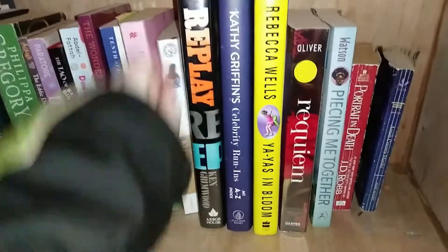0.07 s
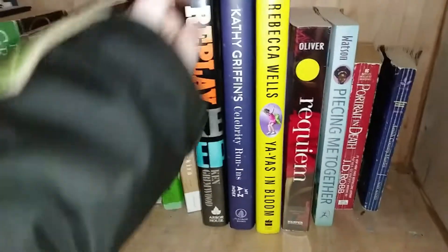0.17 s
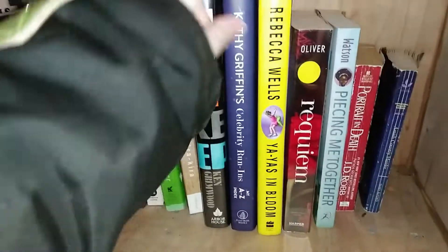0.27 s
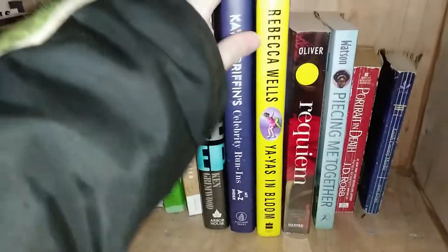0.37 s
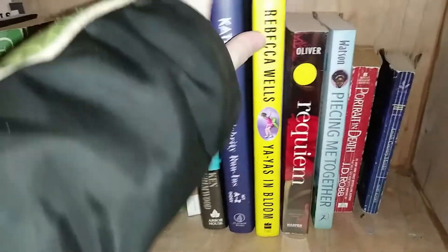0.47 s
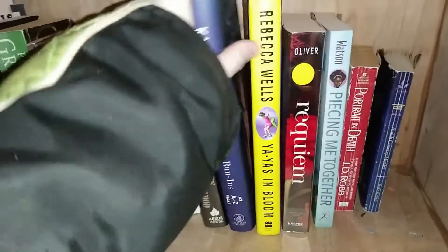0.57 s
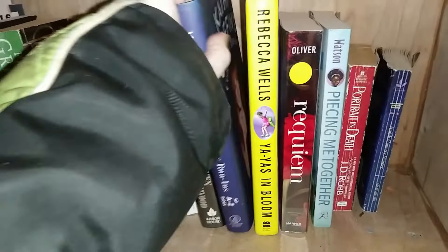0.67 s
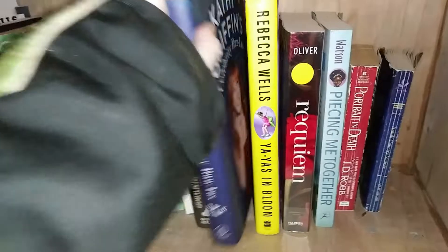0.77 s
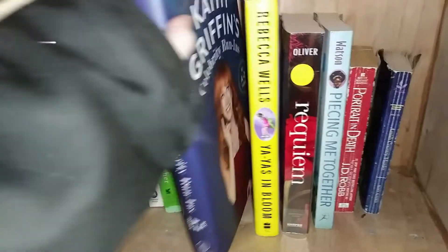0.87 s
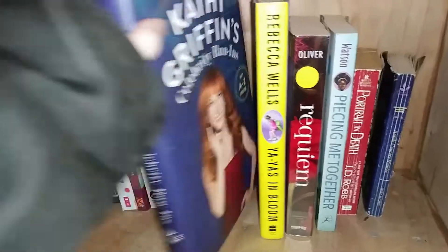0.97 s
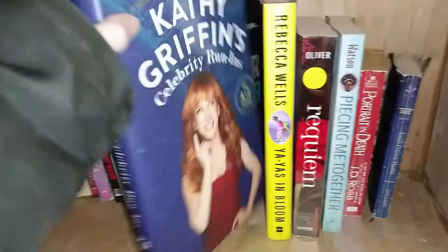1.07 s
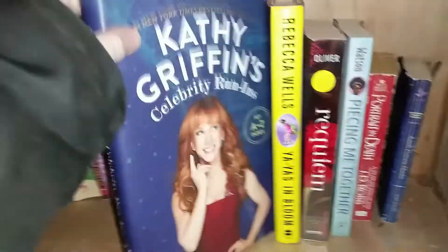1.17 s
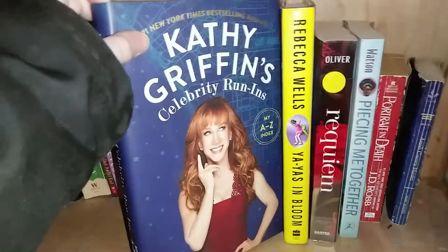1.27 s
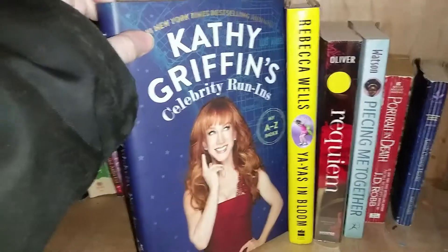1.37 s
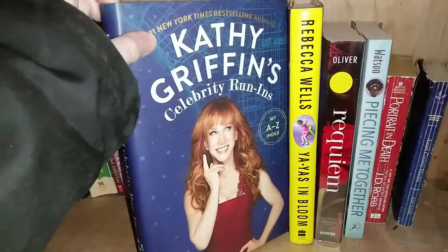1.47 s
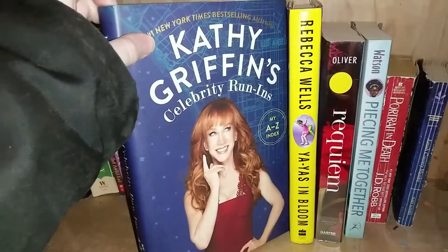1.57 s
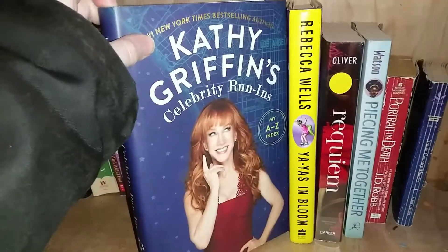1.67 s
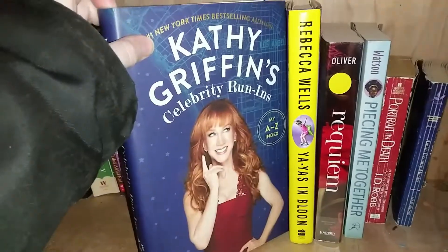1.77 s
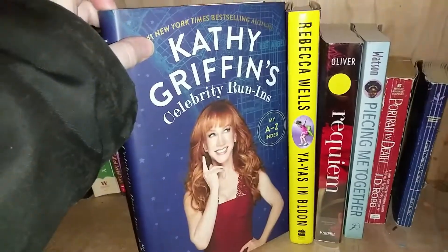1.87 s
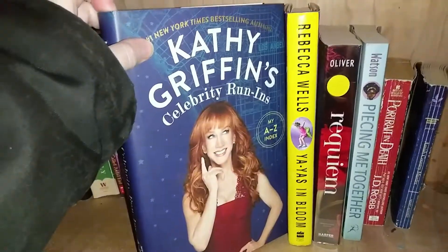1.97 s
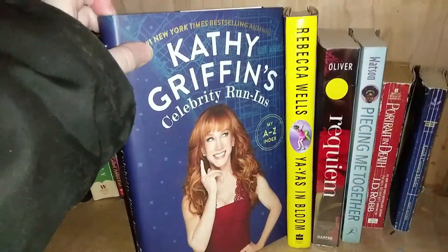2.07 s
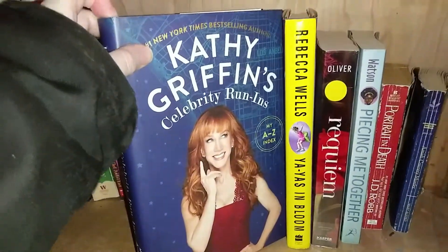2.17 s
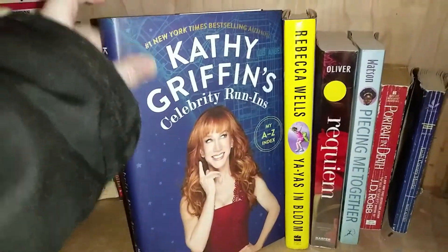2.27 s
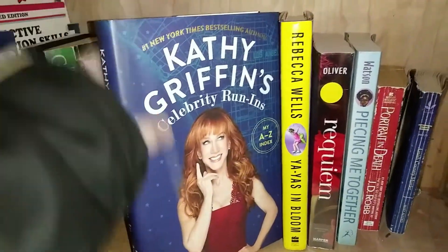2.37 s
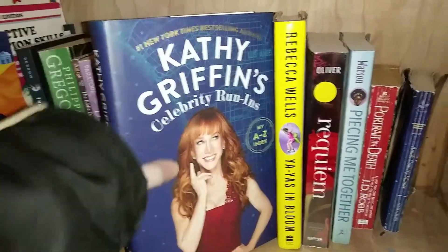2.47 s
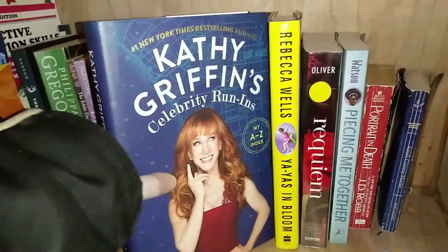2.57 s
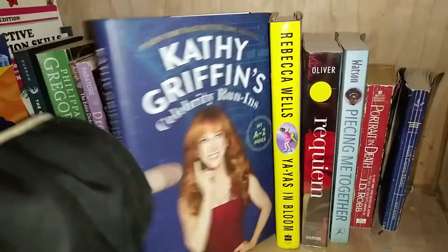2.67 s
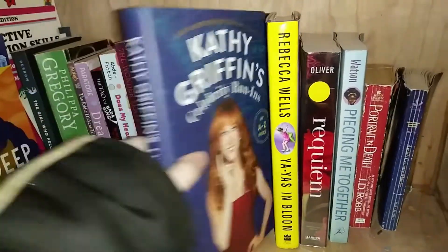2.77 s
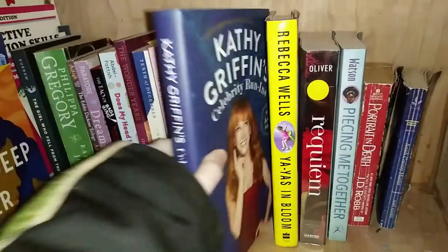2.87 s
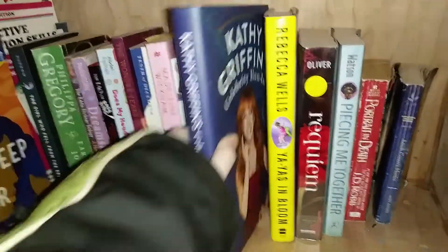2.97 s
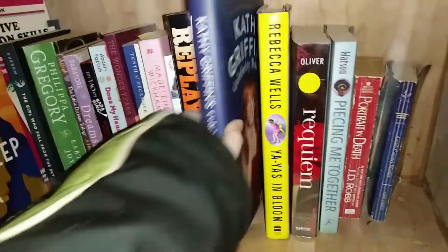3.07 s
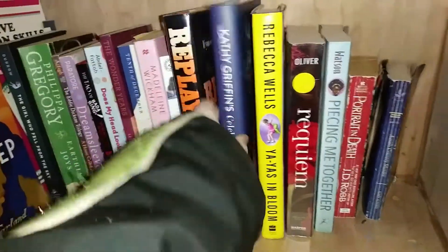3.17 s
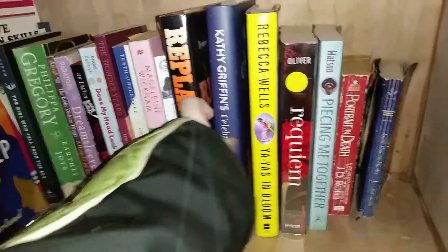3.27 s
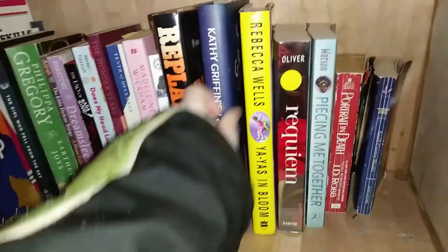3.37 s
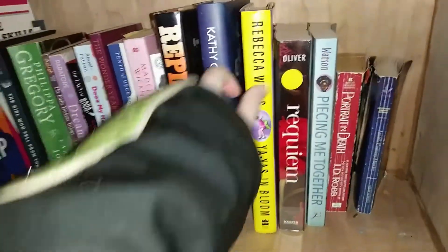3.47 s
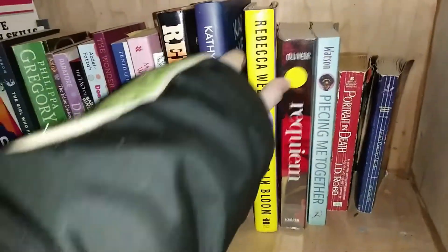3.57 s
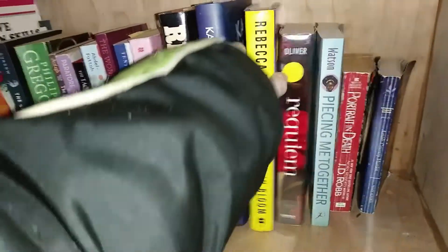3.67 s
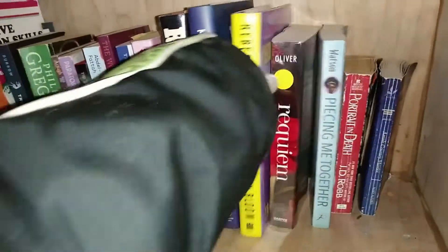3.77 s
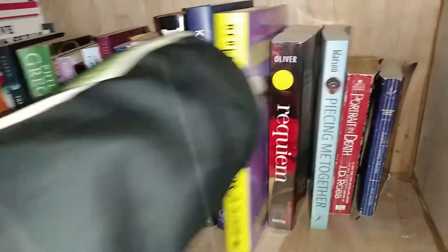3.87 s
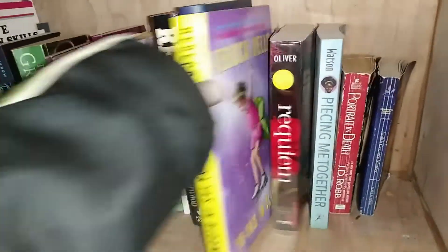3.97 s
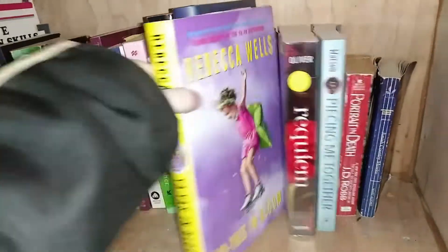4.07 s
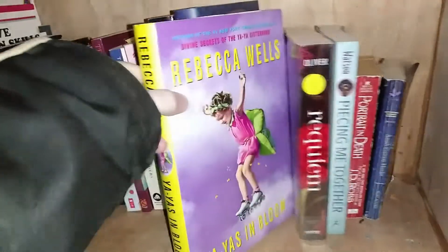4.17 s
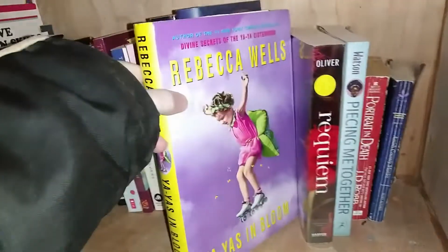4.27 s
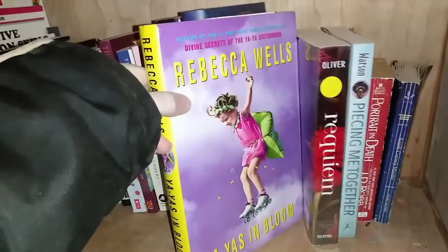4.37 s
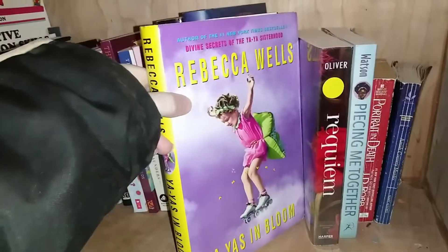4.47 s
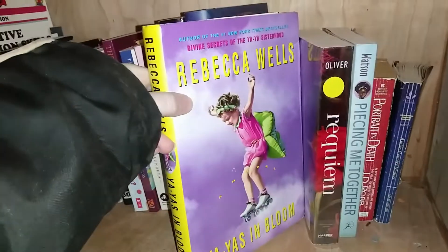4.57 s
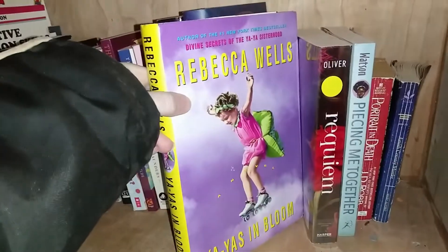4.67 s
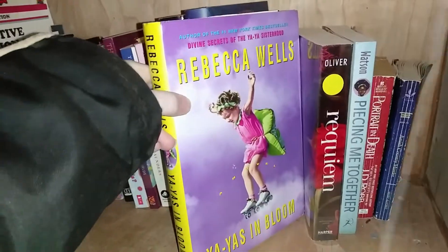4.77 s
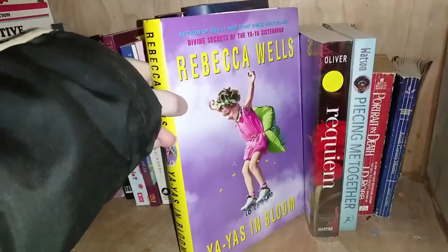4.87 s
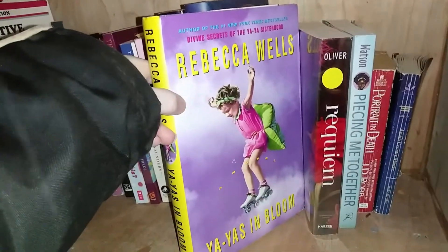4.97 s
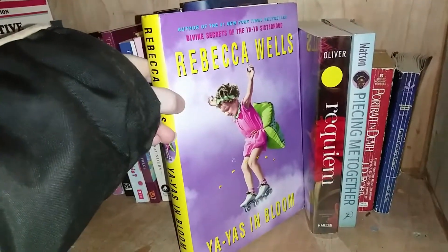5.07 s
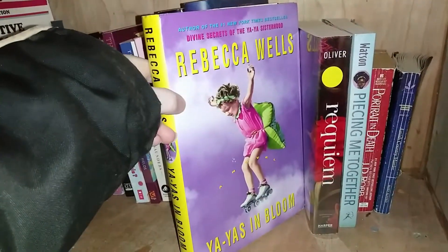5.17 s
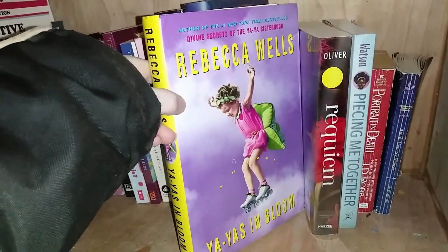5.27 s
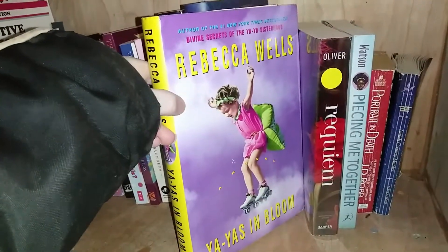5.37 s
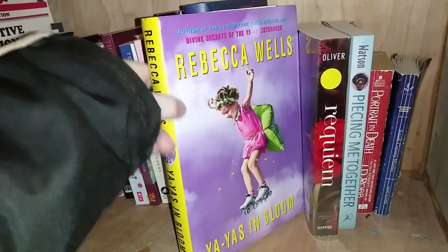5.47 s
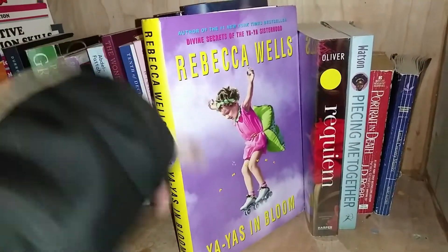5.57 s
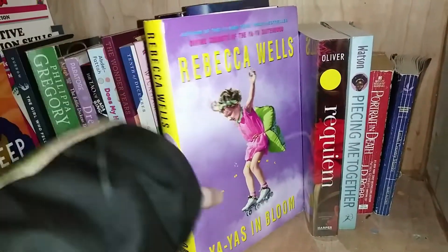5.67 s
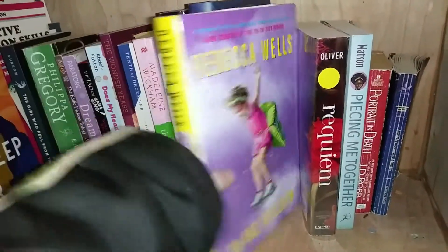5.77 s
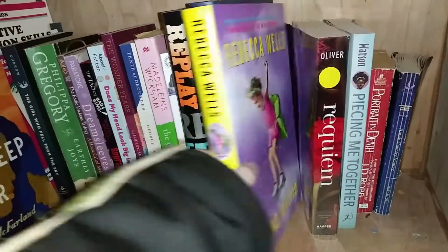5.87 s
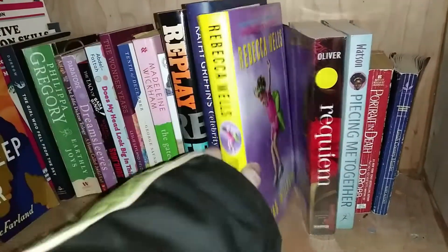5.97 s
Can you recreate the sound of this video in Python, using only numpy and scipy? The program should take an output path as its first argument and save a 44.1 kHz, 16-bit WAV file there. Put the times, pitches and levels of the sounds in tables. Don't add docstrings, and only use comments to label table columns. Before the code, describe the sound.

Close phone microphone at a wooden book box, with thin bass and faint hiss. Bright stick-slip sliding with a short jacket whine comes first, then a crisp hollow clack. After a still pause with tiny clicks, covers snap and rub faster until a heavy book drops corner first, then flat, the loudest moment. Another book scrapes out with a flurry of light taps, rests among sparse ticks, and finally slides back softly.

```python
import sys
import numpy as np
from scipy import signal
from scipy.fft import rfft, irfft
from scipy.io import wavfile
from scipy.ndimage import uniform_filter1d

SR = 44100
rng = np.random.default_rng(int(sys.argv[2]) if len(sys.argv) > 2 else 0)


def unload_audio(sound):
    columns = np.transpose(np.atleast_2d(sound))
    steps = np.round(np.clip(columns, -1, 1) * 32767)
    wavfile.write(sys.argv[1], SR, steps.astype(np.int16))


def gain_from_db(level_db):
    decades = np.asarray(level_db, float) / 20
    return 10 ** decades


N = 264776


def rms_one(x):
    return x / np.sqrt(np.mean(x ** 2) + 1e-20)


def drift(rate):
    r = np.exp(-80 * np.pi * rate / SR)
    noise = rng.standard_normal(N // 40 + 2002)
    slow = signal.lfilter([1], [1, -2 * r, r * r], noise)[2000:]
    return np.interp(np.arange(N) / 40, np.arange(len(slow)), rms_one(slow))


def ring(clicks, hz, t60):
    r = gain_from_db(-60 / (t60 * SR))
    w = 2 * np.pi * hz / SR
    return signal.lfilter([0, np.sin(w)], [1, -2 * r * np.cos(w), r * r], clicks + 1e-18)


def resonance(x, hz, width_hz):
    r = np.exp(-np.pi * width_hz / SR)
    poles = [1, -2 * r * np.cos(2 * np.pi * hz / SR), r * r]
    return signal.lfilter(np.array([1, 0, -1]) * (1 - r * r) / 2, poles, x)


def grains(per_s, spread_db, share):
    sizes = gain_from_db(spread_db * np.minimum(rng.exponential(1, (2, N)), 4)) * rng.choice([-1, 1], (2, N))
    caught = rng.random((1, N)) < per_s / SR
    return share * rms_one(sizes * caught) + np.sqrt(1 - share ** 2) * rng.standard_normal((2, N))


def coloured(source, spectrum, patchy_db, rate):
    out = 0
    together = drift(rate)
    at, level = np.transpose(spectrum)
    edges = 80 * 2 ** np.arange(0, 7.7, 1 / 3)
    for k, (low, high) in enumerate(zip(edges, edges[1:])):
        hz = np.sqrt(low * high)
        if at[0] / 1.3 < hz < at[-1] * 1.3:
            sos = signal.butter(2, [low, high], "band", fs=SR, output="sos")
            band = signal.sosfilt(sos, source[k % 2])
            flicker_db = patchy_db * (together + 0.77 * drift(rate))
            out = out + band * gain_from_db(np.interp(np.log(hz), np.log(at), level) + flicker_db)
    return rms_one(out)


def gesture(s, held, db, rest_db):
    rise_db_per_s, fall_db_per_s = 234, 167
    t = np.arange(N)[::32, None] / SR
    level = db - rise_db_per_s * np.maximum(s - t, 0) - fall_db_per_s * np.maximum(t - s - held, 0)
    gain = np.sqrt(np.sum(gain_from_db(2 * level), axis=1) + gain_from_db(2 * rest_db))
    return np.interp(np.arange(N) / SR, t[:, 0], gain)


def slips(table, spread):
    size = 18000
    out, t = np.zeros(N + size), np.arange(size) / SR
    for s, db, hz, rise, fade in table:
        noise = rng.standard_normal((2, size))
        low_hz, high_hz = hz / spread, hz * spread
        rough = noise[0] * gain_from_db(22 * uniform_filter1d(noise[1], size=90))
        sos = signal.butter(3, [low_hz, high_hz], "band", fs=SR, output="sos")
        tone = rms_one(signal.sosfilt(sos, rough))
        soft = signal.lfilter(*signal.butter(1, 2 * high_hz, fs=SR), tone + 0.071 * rough)
        shape = np.where(t < rise, t / rise, gain_from_db(-60 * (t - rise) / fade))
        out[round(s * SR):][:size] += gain_from_db(db) * shape * soft
    return out[:N]


def ticks(table, t60, stutter=0):
    out, click = np.zeros(N + 600), np.eye(1, 600)[0]
    click[round(0.0014 * SR) * np.array([1, 2])] = -stutter, stutter ** 2
    for s, db, hz in table:
        apart = rng.uniform(1.1, 1.3)
        snap = ring(click, hz, t60) + 1.07 * ring(click, hz / apart, t60)
        snap = snap - 0.5 * ring(click, hz * apart, 1.5 * t60)
        tick = resonance(resonance(snap, hz, 2.5 * hz), hz, 1.7 * hz)
        tick = tick + 0.65 * resonance(click, 0.55 * hz, 0.5 * hz) + 0.5 * resonance(click, 11400, 6000)
        out[round(s * SR):][:600] += gain_from_db(db - 1.5) * tick
    return out[:N]


def knocks(blows, modes):
    out, click = np.zeros(N + 9000), np.eye(1, 9000)[0]
    for s, db, hard_hz, deep_db, free in blows:
        body = 0
        for k, (hz, level_db, t60) in enumerate(modes):
            gain_db = level_db + 2 * rng.standard_normal() + deep_db * (hz < 550)
            body = body + (-1) ** k * gain_from_db(gain_db) * ring(click, hz, t60 * max(free, 0.1))
        out[round(s * SR):][:9000] += gain_from_db(db - 7) * signal.lfilter(*signal.butter(2, hard_hz, fs=SR), body)
    return out[:N]


def far_air():
    # f/Hz, level/dB
    air_spectrum = [(47, -60), (80, -33), (208, -9), (386, -5), (471, 2), (1090, -6.5), (1370, -6),
                    (1600, 0.5), (1860, -7.5), (2080, -8), (3390, -22.5), (5400, -19), (10300, -26),
                    (15000, -33.5), (16000, -31)]
    # f/Hz, width/Hz, level/dB
    box_modes = [(472.5, 9.7, 6.5), (850, 26, 2), (1373, 86, 3), (1823, 63, 7)]
    wash = coloured(rng.standard_normal((2, N)), air_spectrum, patchy_db=0.67, rate=12)
    box = sum(gain_from_db(db) * resonance(wash, hz, width) for hz, width, db in box_modes)
    return gain_from_db(-56 - 6.5) * (wash + 0.76 * box)


def hand():
    # f/Hz, level/dB
    rub_spectrum = [(2200, -19), (3000, -6.5), (3800, -25), (4600, 1.5), (5600, -1), (6600, 1.5),
                    (7800, -13), (9400, -23), (12000, -30)]
    # f/Hz, level/dB
    drag_spectrum = [(59, -63.5), (100, -28), (194, -8), (290, -4.5), (555, -4.5), (779, 0), (1910, -3.5),
                     (2330, -4), (2850, -3.5), (4000, -7), (5200, -22), (8800, -120)]
    # f/Hz, level/dB
    swish_spectrum = [(5000, -52), (8000, 19.5), (10000, -21), (13000, 11), (16000, -34)]
    # t/s, held/s, cover rub level/dB, weight on the edge/dB
    strokes = [(0, .25, -60.5, 1), (.44, 0.087, -62.5, -1.5), (.55, 0.085, -48, -4.5),
               (.73, 0.074, -51.5, -4), (.85, 0.18, -54, -0.5), (1.04, 0.07, -53.5, 3),
               (1.15, 0.12, -55, -6), (2.19, 0.034, -63.5, 0), (2.32, 0.069, -50.5, -17),
               (2.409, 0.094, -47, -8.5), (2.59, 0.049, -45, -11), (2.72, 0.033, -44.5, -6.5),
               (2.82, .06, -63.5, 7.5), (2.94, 0.018, -43, -1.5), (3.0, 0.071, -47.5, 1),
               (3.09, 0.083, -40, -7.5), (3.25, 0.044, -60, 4), (3.309, 0.062, -49.5, -5.5),
               (3.5, 0.02, -51.5, 1), (3.58, 0.044, -47.5, -3.5), (3.69, .09, -56, 0.5),
               (3.83, 0.14, -47.5, -2), (4.01, 0.074, -44, -3.5), (4.09, 0.047, -43.5, -1.5),
               (4.17, 0.072, -49.5, 3), (4.88, 0.11, -66, 1.5), (5.61, 0.057, -57, -11),
               (5.72, 0.028, -69.5, 11.5), (5.801, 0.052, -48.5, -4), (5.95, 0.065, -52, -4.5)]
    # t/s, held/s, level/dB
    swings = [(0, 0.36, -70), (.56, 0.027, -59), (.86, 0.46, -66.5), (2.32, 0.18, -54.5), (2.73, .02, -63),
              (2.88, .17, -62.5), (3.11, 0.063, -54.5), (3.48, 0.49, -64.5), (3.97, 0.046, -67),
              (4.15, .07, -65), (4.58, 0.21, -73.5), (5.6, 0.09, -65), (5.79, .06, -64), (5.959, .05, -72)]
    s, held, db, weight_db = np.transpose(strokes)
    rub = coloured(grains(900, spread_db=4, share=0.45), rub_spectrum, patchy_db=1.5, rate=45)
    drag = coloured(grains(500, spread_db=3.5, share=0.4), drag_spectrum, patchy_db=1.7, rate=35)
    swish = coloured(grains(400, spread_db=4, share=0.35), swish_spectrum, patchy_db=1.2, rate=30)
    covers = gesture(s, held, db, rest_db=-65) * rub
    edges = gesture(s, held, db + weight_db, rest_db=-64) * drag
    sleeve = gesture(*np.transpose(swings), rest_db=-95) * swish
    return covers + edges + sleeve


def creaks():
    sizes = gain_from_db(3.5 * np.minimum(rng.exponential(1, N), 3)) * rng.choice([-1, 1], N)
    clicks = (rng.random(N) < 45 / SR) * sizes
    return gain_from_db(-47) * resonance(clicks, 7000, 8000)


def cover_slips():
    # t/s, level/dB, centre f/Hz, rise/s, fade/s
    cover_bursts = [(.381, -48.5, 5300, 0.0034, 0.046), (.511, -33, 5080, 0.012, 0.18),
                    (.96, -49.5, 850, 0.16, .1), (1.2438, -30, 5800, 0.0015, 0.013),
                    (1.249, -42, 4870, 0.0023, 0.048), (2.4077, -42.5, 6040, 0.0093, 0.39),
                    (2.552, -34.5, 6560, .011, 0.0084), (2.582, -38, 5420, 0.0041, 0.07),
                    (2.61, -47.5, 5370, 0.027, 0.3), (2.868, -44, 4660, 0.0028, 0.084),
                    (3.178, -32, 5930, 0.0055, 0.11), (3.189, -29.5, 3600, 0.0027, 0.099),
                    (3.2096, -11, 3180, 0.0035, 0.017), (3.2105, -17, 5280, 0.0026, 0.01),
                    (3.489, -41, 4300, 0.001, 0.26), (3.734, -37.5, 5300, 0.011, 0.26),
                    (4.06, -33, 4900, 0.0061, 0.19)]
    return slips(cover_bursts, spread=1.395)


def held_ticks():
    # t/s, peak level/dB
    faint = [(.403, -40), (1.5034, -34.5), (1.645, -41.5), (1.702, -51), (1.8861, -42), (2.094, -44),
             (2.154, -38), (2.1934, -45), (4.35, -32.5), (4.554, -42), (4.6294, -49), (4.744, -38),
             (4.7731, -35.5), (5.167, -55), (5.2023, -46), (5.27, -42), (5.3297, -45), (5.46, -32),
             (5.496, -41)]
    return ticks([(s, db, 5000 * np.exp(0.05 * rng.standard_normal())) for s, db in faint], t60=0.0028)


def whines():
    # t/s, level/dB, centre f/Hz, rise/s, fade/s
    whine_bursts = [
        (.515, -31, 5340, 0.017, 0.11),
        (.52, -37, 3910, 0.015, 0.15),
        (1.2443, -30, 4750, 0.0033, .012),
        (1.87, -65, 315, 0.25, 0.4),
        (2.6, -57, 5650, 0.076, 0.28),
        (3.29, -43.5, 4250, 0.026, 0.21),
        (3.35, -49, 4070, .065, .02),
        (3.209, -16.5, 5400, 0.0014, 0.027),
        (3.645, -46.5, 7360, 0.0068, 0.032),
    ]
    return slips(whine_bursts, spread=1.085)


def sleeve_crackles():
    # t/s, peak level/dB, f/Hz
    cloth_snaps = [(0.8111, -42, 9500), (0.8305, -46, 9000), (0.85, -34, 9100), (2.0632, -51, 8180),
                   (2.1261, -35.5, 10100), (2.1404, -36, 9150), (2.1779, -47, 8370), (2.1854, -45, 8200),
                   (3.2454, -46, 8300), (3.481, -31.5, 7960), (3.5394, -43, 8000), (3.8008, -32.5, 8100),
                   (5.5263, -40, 9810)]
    return ticks(cloth_snaps, t60=0.0028)


def jacket_ticks():
    # t/s, peak level/dB, f/Hz
    jacket_snaps = [(0.85, -33, 4600), (1.103, -31, 4730), (1.1152, -32.5, 5460), (1.205, -33, 7000),
                    (2.593, -30.5, 6000), (2.78, -27, 5300), (3.482, -26.5, 5920), (3.5604, -35, 4570),
                    (3.652, -39, 7400), (3.7323, -24.5, 4940), (3.7435, -23, 5100), (3.9674, -26, 4900),
                    (3.998, -24, 4900), (4.0678, -21, 5140), (4.0798, -22, 4860), (4.0942, -28, 5200),
                    (4.1775, -40, 3000), (5.7839, -43, 5900), (5.885, -35, 5700), (5.4154, -44, 3150)]
    return ticks(jacket_snaps, t60=0.0056, stutter=0.32)


def book_taps():
    # t/s, level/dB, hardness f/Hz, share of the deep modes/dB, ring (1 free, 0 held)
    tap_blows = [(1.103, -38, 1438, -2.5, 1), (1.116, -34, 1188, -10, 1), (1.243, -16, 1100, -14, 0.7),
                 (1.249, -19, 900, -8.5, 0.6), (1.258, -39, 500, 4, 0.59), (2.868, -45, 600, -5, 1),
                 (3.811, -25, 650, -7, 0.47), (3.813, -34, 550, -1, 0.7), (3.967, -31, 2000, -14, 0.64),
                 (3.996, -21.5, 2500, -22, 0.32), (4.055, -27, 700, 0, 0.46), (4.066, -30, 1990, -28, 0.66),
                 (4.074, -26, 2000, -14, 0.51), (4.084, -31, 2000, -4, 0.49),
                 (4.142, -28.5, 1200, -4, 0.37), (4.154, -38, 2500, -17, .6), (4.166, -40, 1500, -22, .6),
                 (4.178, -53, 2500, -19, .5), (4.212, -43, 1500, -15, 0.47), (4.257, -34.5, 1500, -18, 1),
                 (5.79, -34.5, 1200, -24, 0.75)]
    # f/Hz, level/dB, t60/s
    row_modes = [(178.6, -32, 0.48), (230, -4, 0.031), (303, -4, 0.072), (336, -1.5, 0.13),
                 (416, -0.5, 0.066), (494, -8, 0.035), (587, -5, 0.026), (830, 0.5, 0.015),
                 (893, -2, 0.039), (1260, -3, 0.053), (1406, -6, 0.049), (1640, -2.5, 0.031),
                 (2500, 0.5, 0.03)]
    return knocks(tap_blows, row_modes)


def raps():
    # t/s, level/dB, f/Hz, t60/s
    corner_raps = [(1.2425, -27, 575, 0.039), (1.249, -28, 800, 0.021), (1.246, -29, 2500, 0.019),
                   (1.259, -30.5, 336, 0.075), (1.27, -41, 800, .03), (2.869, -46.5, 600, 0.017),
                   (3.146, -40, 251, .04), (3.19, -15.5, 220, 0.043), (3.19, -17, 178, 0.045),
                   (3.1914, -12.5, 680, 0.031), (3.195, -15.5, 432, 0.029), (3.212, -17, 1010, 0.033),
                   (3.213, -21.5, 176, 0.054), (3.763, -43, 400, 0.029), (3.8123, -31, 1260, 0.023),
                   (3.8114, -28.5, 350, 0.019), (3.815, -28, 620, .02), (3.827, -37.5, 342, 0.054),
                   (3.838, -39, 340, 0.044), (3.951, -40, 1250, 0.022), (3.968, -38.5, 880, .03),
                   (3.997, -31.5, 1180, .025), (4.055, -32.5, 377, 0.021), (4.058, -36, 695, 0.021),
                   (4.064, -34, 315, 0.096), (4.067, -32, 1250, 0.022), (4.075, -30, 1390, .025),
                   (4.084, -34, 1280, 0.038), (4.094, -35, 1150, .02), (4.141, -35, 1300, 0.013),
                   (4.145, -34.5, 773, .035), (4.154, -36, 1200, .015), (4.178, -35.5, 1270, .02),
                   (4.178, -33.5, 2400, 0.016), (4.211, -45, 705, .02), (4.23, -45, 890, 0.018),
                   (4.258, -40, 1000, 0.018)]
    out, click = np.zeros(N + 6000), np.eye(1, 6000)[0]
    for s, db, hz, t60 in corner_raps:
        note = ring(click, hz, t60) + gain_from_db(-10) * ring(click, hz * 1.124, 0.68 * t60)
        contact = signal.butter(1, [0.5 * hz, 2 * hz], "band", fs=SR)
        out[round(s * SR):][:6000] += gain_from_db(db + 0.5) * signal.lfilter(*contact, note)
    return out[:N]


def paper_slaps():
    # t/s, level/dB, centre f/Hz, fade/s
    block_slaps = [(1.243, -21.5, 555, 0.033), (1.255, -40, 325, 0.14), (1.245, -34.5, 1300, 0.027),
                   (3.488, -36, 2500, 0.024), (3.732, -45, 1010, 0.2), (3.19, -19, 333, 0.056),
                   (3.212, -17, 680, 0.023), (4.054, -36, 430, 0.04), (4.068, -38.5, 1240, 0.17),
                   (4.142, -43, 795, 0.027), (4.154, -45, 1500, 0.018), (4.178, -43, 1610, .018)]
    return slips([(s, db, hz, 0.0031, fade) for s, db, hz, fade in block_slaps], spread=2.34)


def cover_catches():
    # t/s, peak level/dB, f/Hz
    cover_snaps = [(1.2452, -14.5, 5500), (1.247, -20.5, 6200), (1.2456, -13, 4700), (1.249, -22, 4700),
                   (3.2118, -15, 5100), (4.1785, -29, 2630), (4.086, -24, 3000), (4.211, -32, 3100),
                   (4.154, -33, 2800), (2.4086, -33, 5800), (2.562, -20, 6130), (2.5855, -31, 6800),
                   (2.5875, -29, 6200), (3.1, -35.5, 5400), (2.728, -29, 5200), (2.6, -43, 4200),
                   (2.4, -37, 4800), (2.9494, -30, 5400), (2.4, -31, 7300), (3.1409, -29, 5300)]
    return resonance(ticks(cover_snaps, t60=0.0056), 4800, 7000)


def hardback_landing():
    # t/s, level/dB, hardness f/Hz, share of the deep modes/dB, ring (1 free, 0 held)
    landing_blows = [
        (3.189, -12, 1320, -1.5, 0.68),
        (3.192, -13, 604, 3.5, 0.31),
        (3.196, -27.5, 400, -5, 0.5),
        (3.211, -9.5, 2500, -0.5, 0.86),
        (3.214, -12, 1280, -1.5, 0.74),
    ]
    # f/Hz, level/dB, t60/s
    board_modes = [(132, -11, 0.1), (176, 1, 0.13), (211, -3.5, 0.067), (308, -4, 0.026), (353, -10, 0.15),
                   (430, 9, 0.06), (473, 1, 0.12), (644, -3, 0.061), (689, -3, 0.06), (784, -11, 0.12),
                   (1120, -7, 0.022), (1300, -1.5, 0.028), (1465, 3, 0.046), (1530, -24, 0.008),
                   (1900, -3, 0.015), (2400, -13, 0.025)]
    return knocks(landing_blows, board_modes)


def scene():
    friction = far_air() + hand() + creaks()
    bursts = cover_slips() + whines() + paper_slaps()
    clicks = held_ticks() + sleeve_crackles() + jacket_ticks() + cover_catches()
    wood = book_taps() + raps() + hardback_landing()
    return (friction + bursts + clicks + wood)[None]


def starve(x):
    # t/windows (1024/48000 s each); fractional ones, beside a snap, dip wider
    thin_moments = [2, 30, 33, 43, 62, 100, 116, 119.85, 177.15, 182, 188, 221, 226, 234, 239]
    window_s = 1024 / 48000
    out, half = x.copy(), round(window_s * SR)
    turn = np.pi * (np.arange(2 * half) + 0.5) / (2 * half)
    for moment in thin_moments:
        a = round((moment + 0.58) * window_s * SR) - half
        lines = rfft(x[a:a + 2 * half] * np.sin(turn))
        size = abs(lines)
        kept = size > 1.5 * uniform_filter1d(size, size=120) + 0.4 * np.sort(size)[-100]
        boost, power = (0.35, 2) if moment % 1 else (0.6, 1)
        dip = (1 - abs(np.cos(turn)) ** power) / np.sin(turn)
        out[a:a + 2 * half] += boost * np.sin(turn) * irfft(lines * kept, 2 * half)
        out[a:a + 2 * half] -= dip * irfft(lines * ~kept, 2 * half)
    return out


def low_pass(x):
    return signal.sosfilt(signal.butter(12, 15900, fs=SR, output="sos"), x)


def record(dry):
    cut = signal.sosfilt(signal.butter(10, 118, "high", fs=SR, output="sos"), dry[0])
    cut = cut + 0.041 * cut ** 2 + gain_from_db(-71.5) * rng.standard_normal(N)
    mix = starve(cut)[None]
    return low_pass(mix)


dry = scene()
out = record(dry)
unload_audio(out)
```